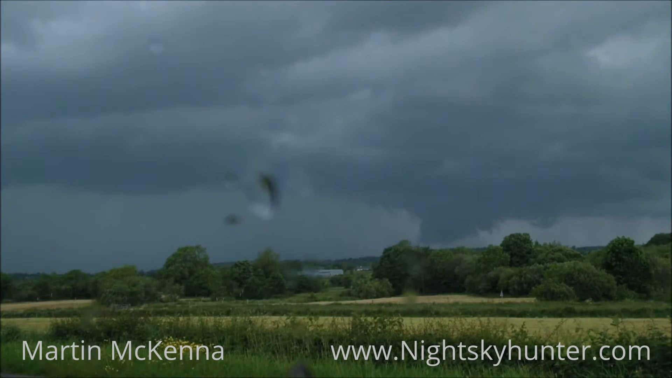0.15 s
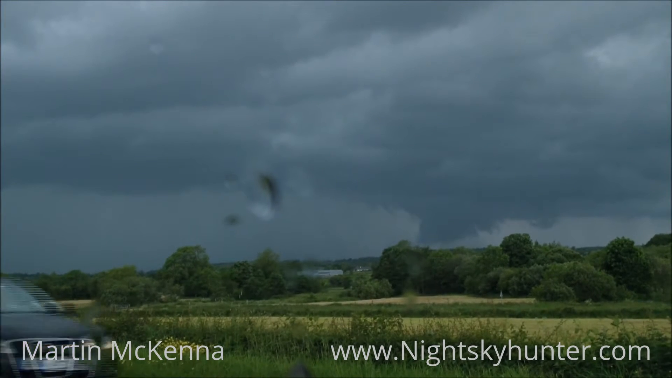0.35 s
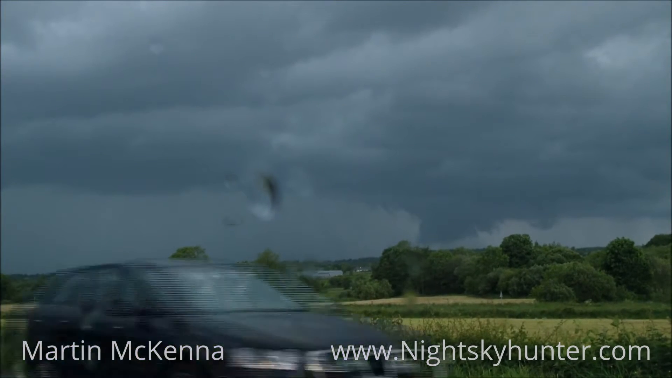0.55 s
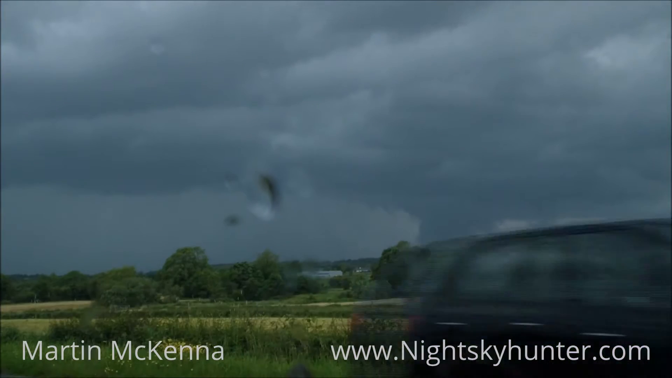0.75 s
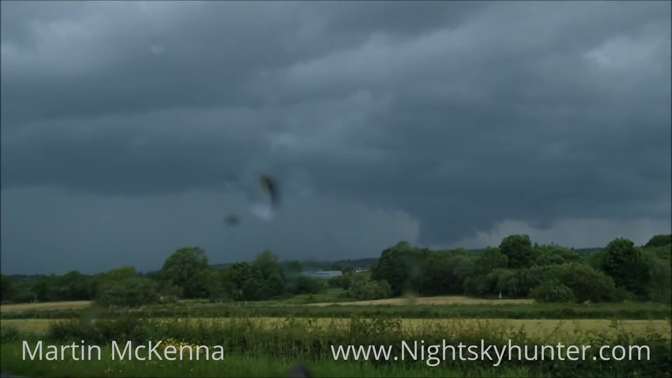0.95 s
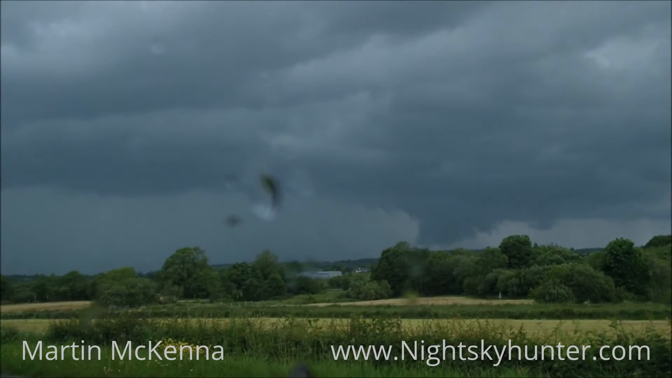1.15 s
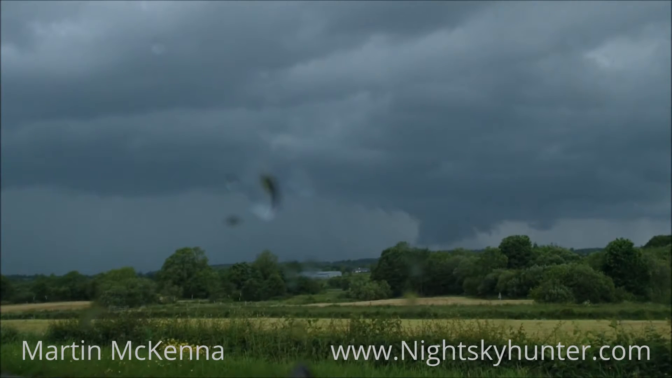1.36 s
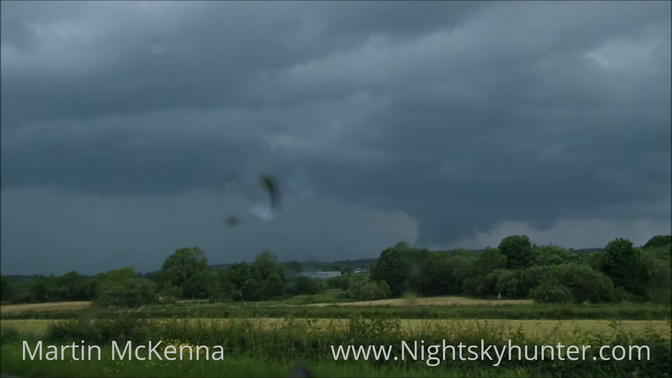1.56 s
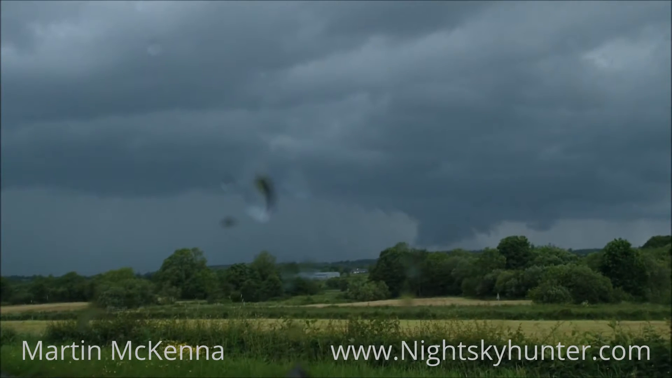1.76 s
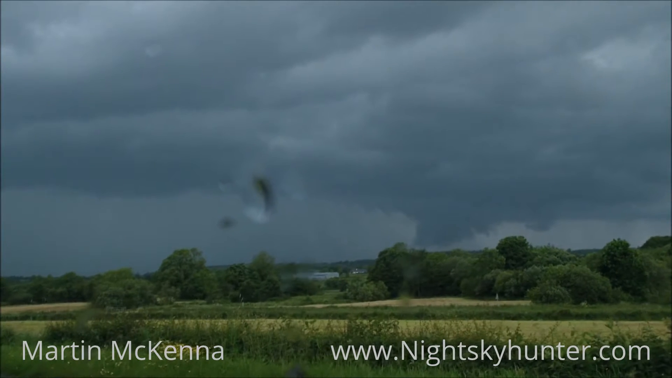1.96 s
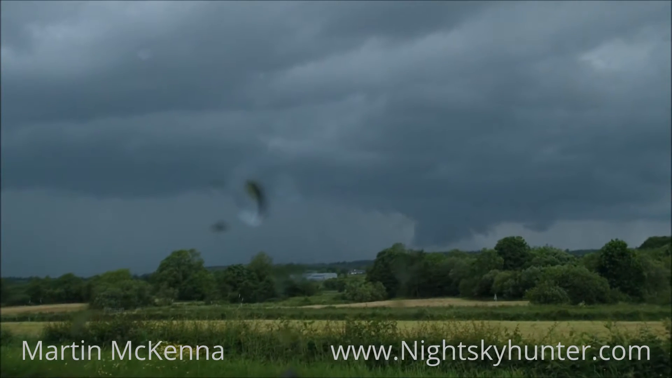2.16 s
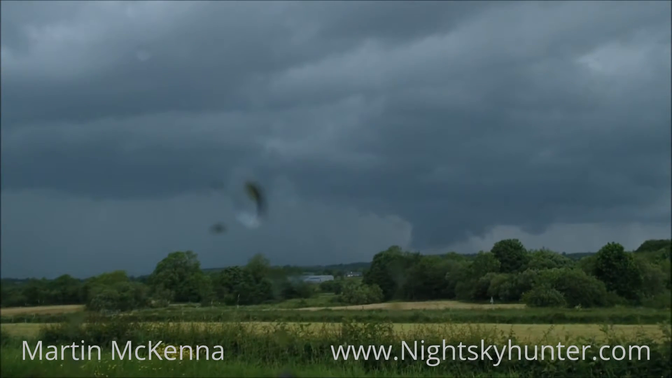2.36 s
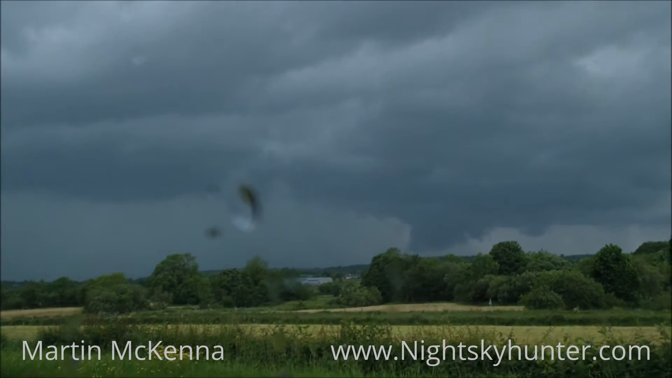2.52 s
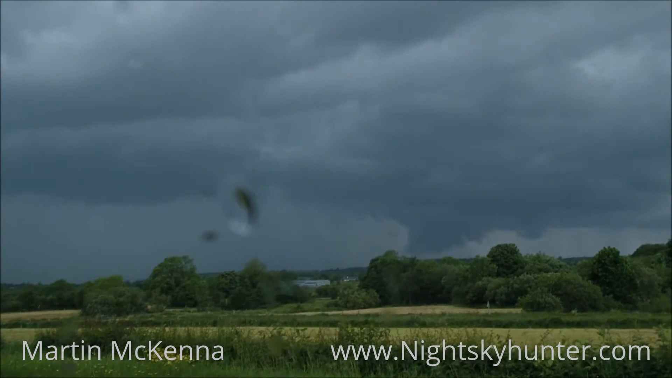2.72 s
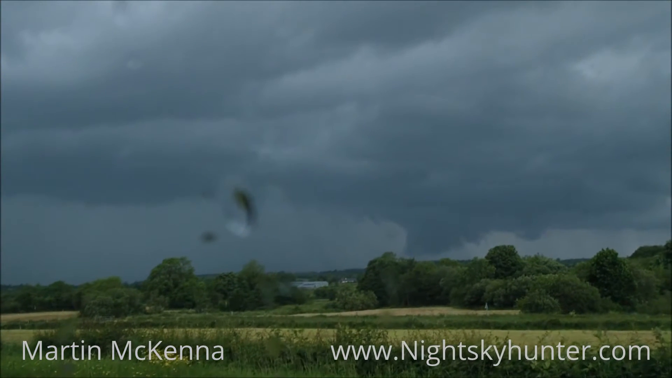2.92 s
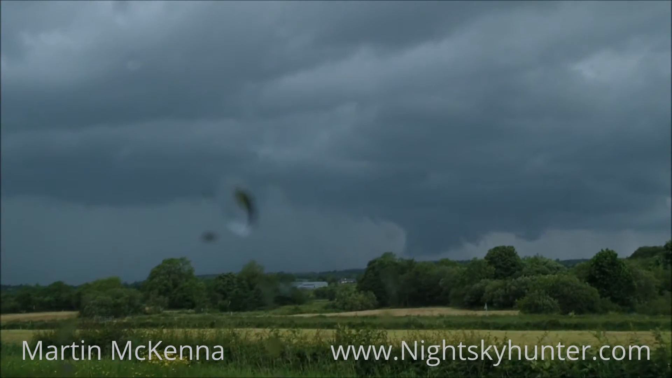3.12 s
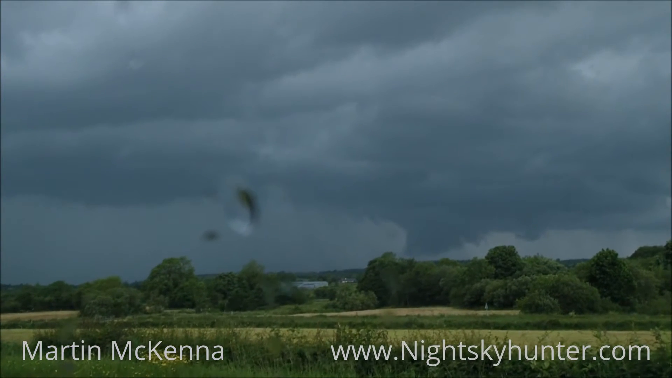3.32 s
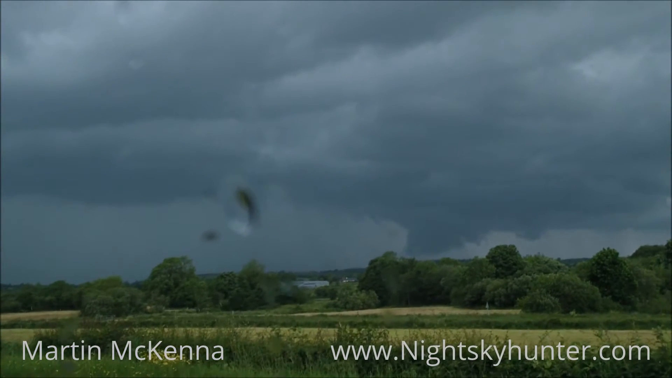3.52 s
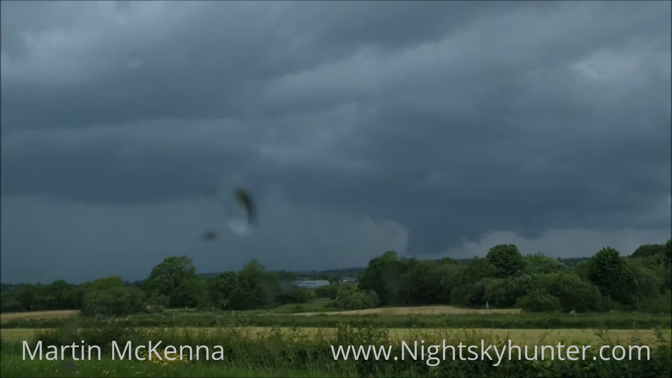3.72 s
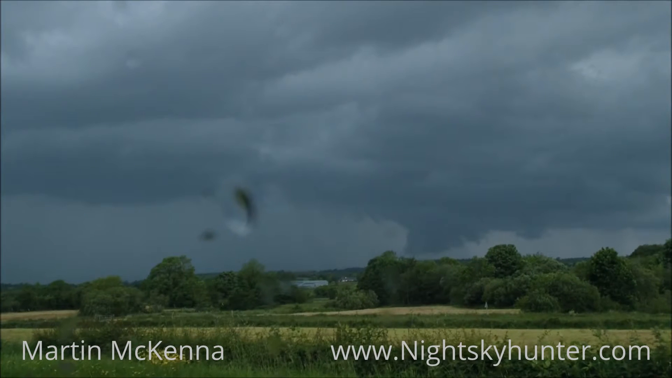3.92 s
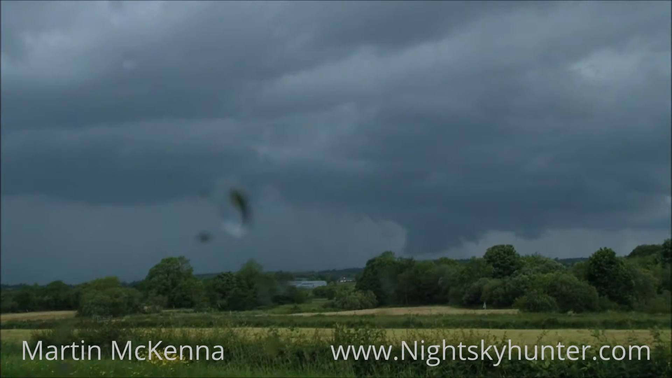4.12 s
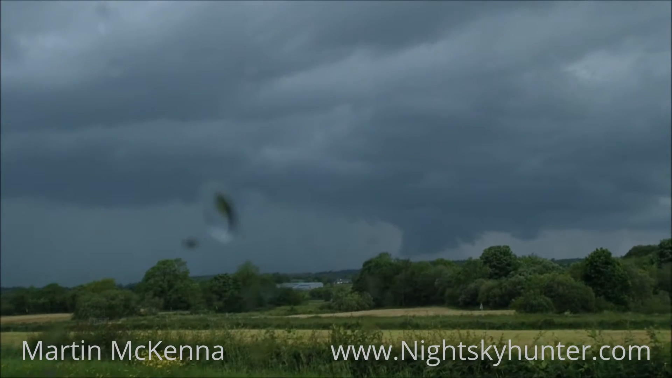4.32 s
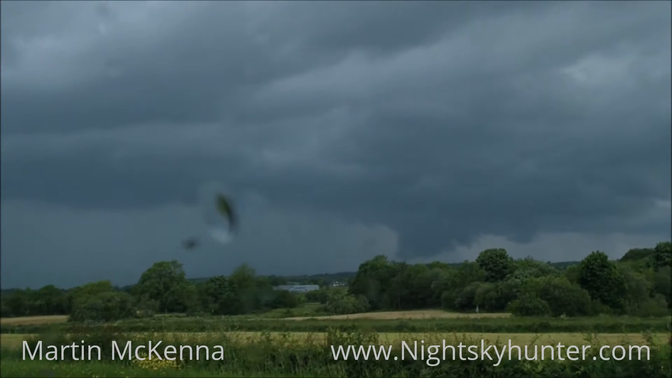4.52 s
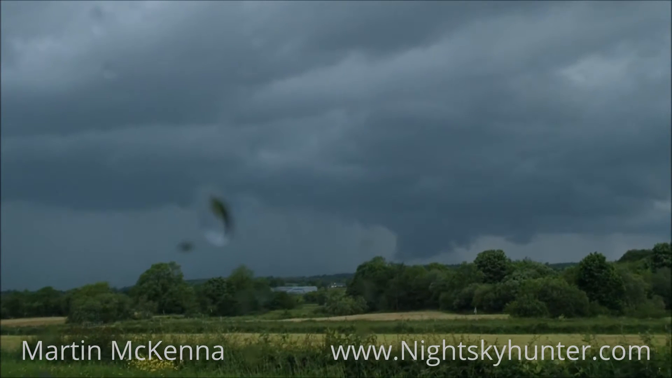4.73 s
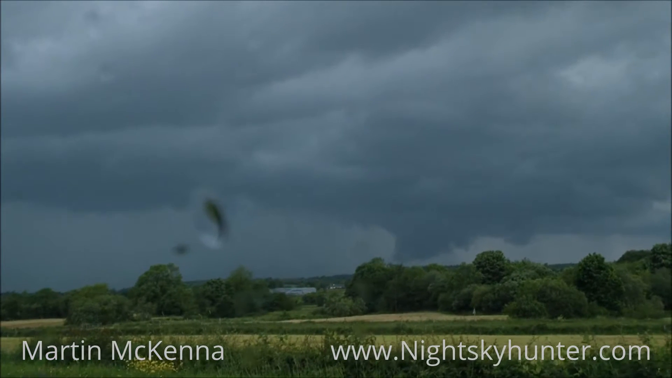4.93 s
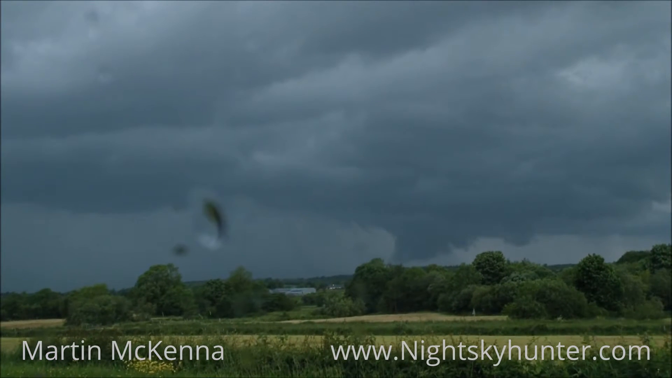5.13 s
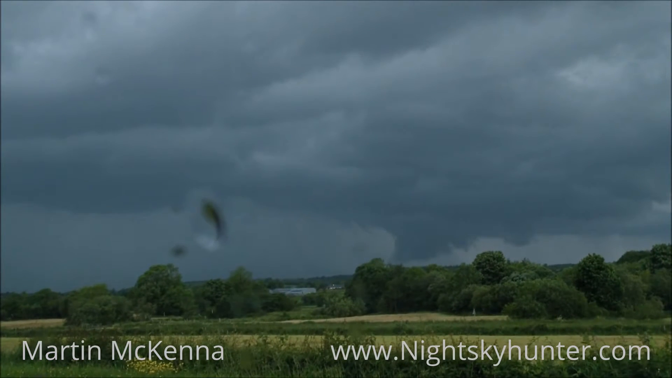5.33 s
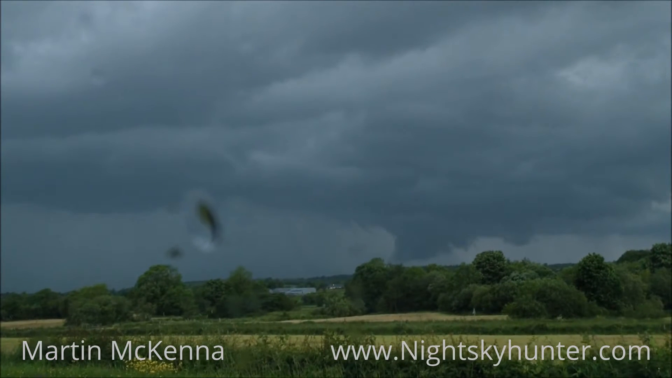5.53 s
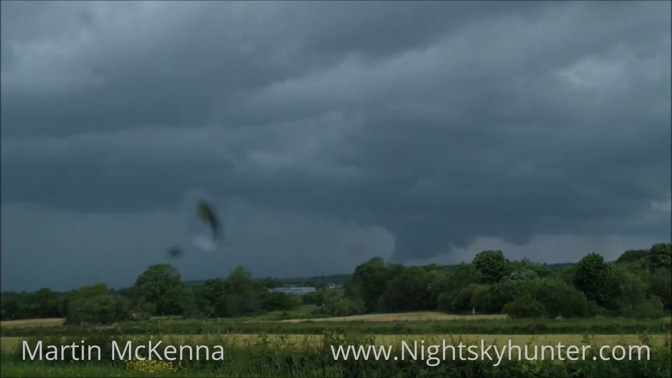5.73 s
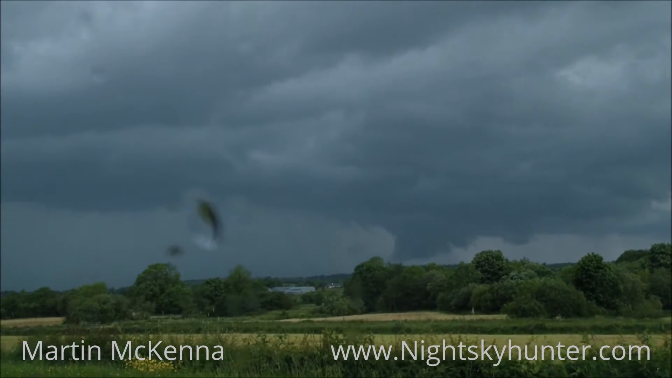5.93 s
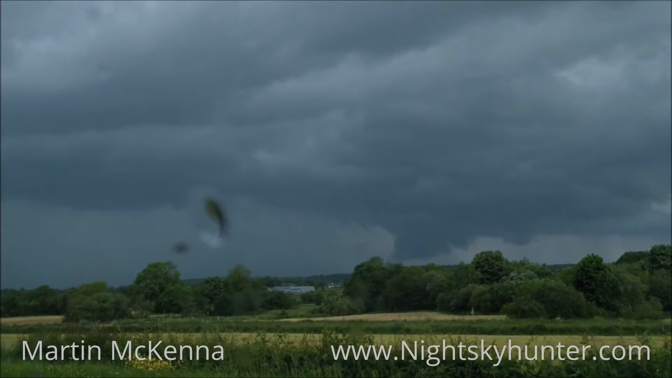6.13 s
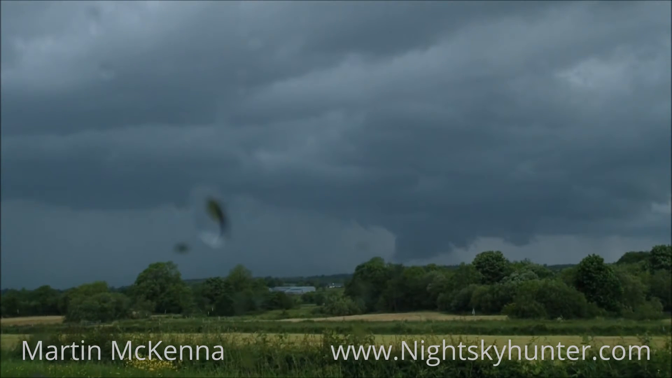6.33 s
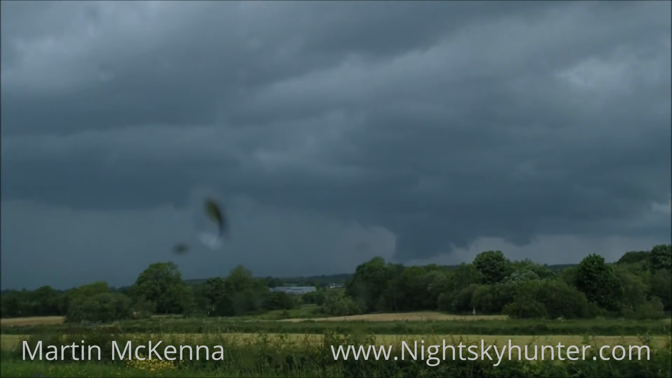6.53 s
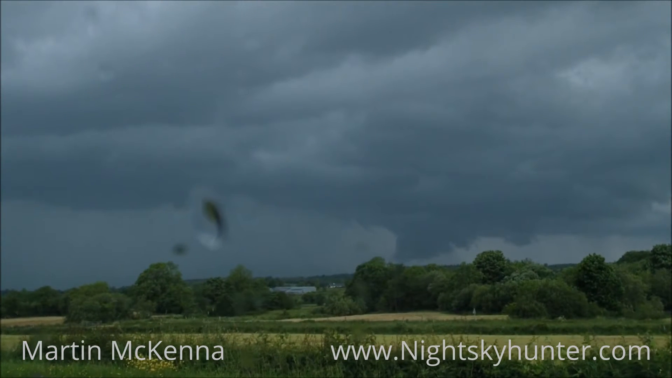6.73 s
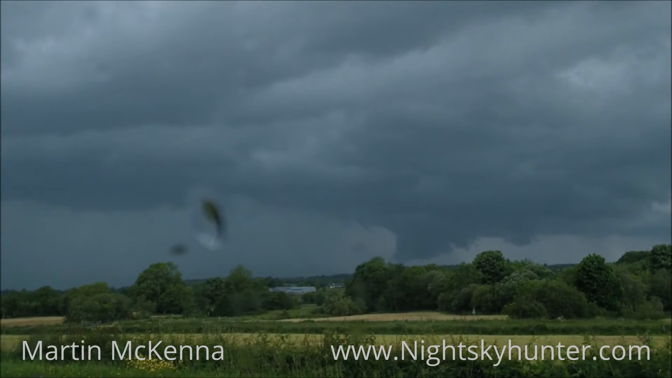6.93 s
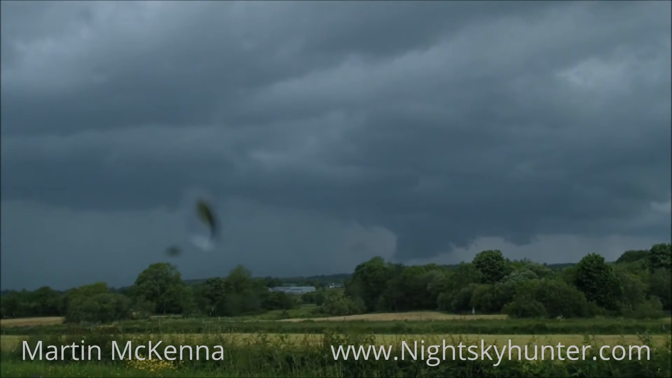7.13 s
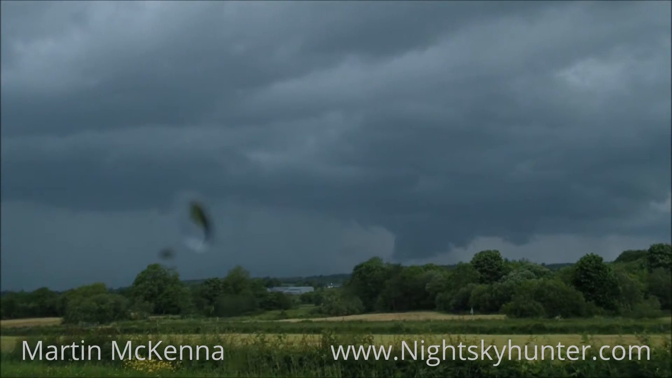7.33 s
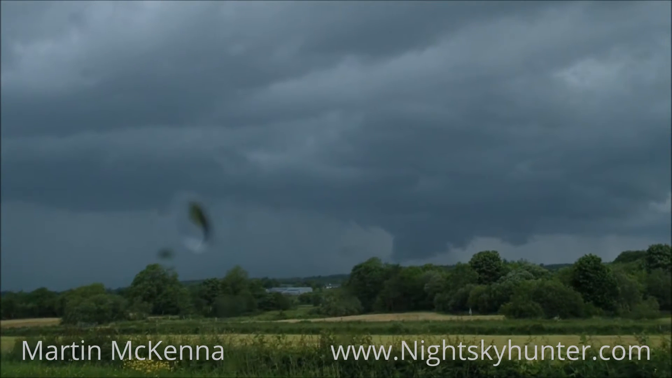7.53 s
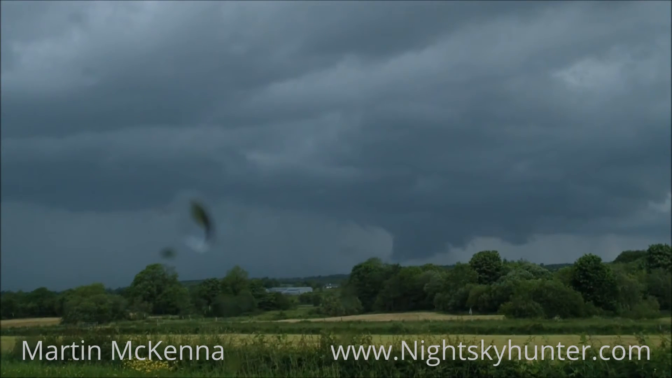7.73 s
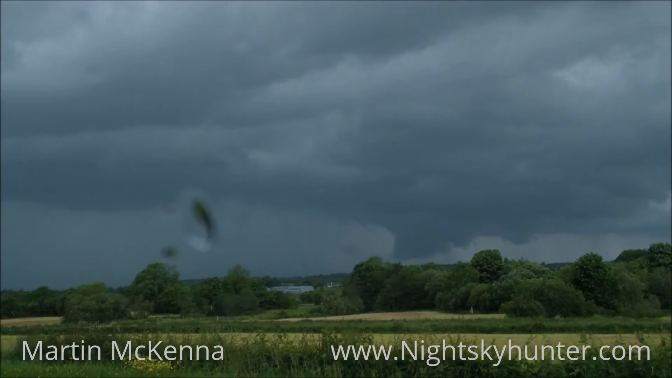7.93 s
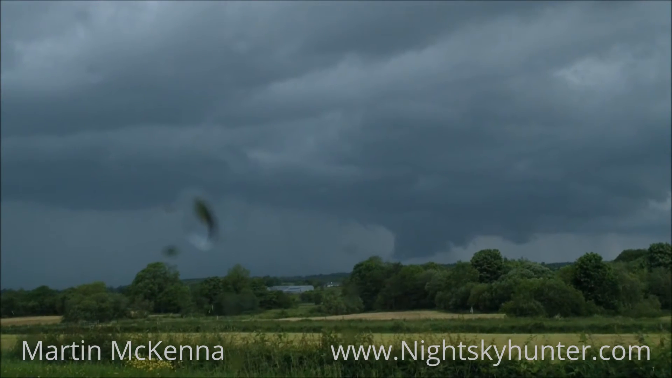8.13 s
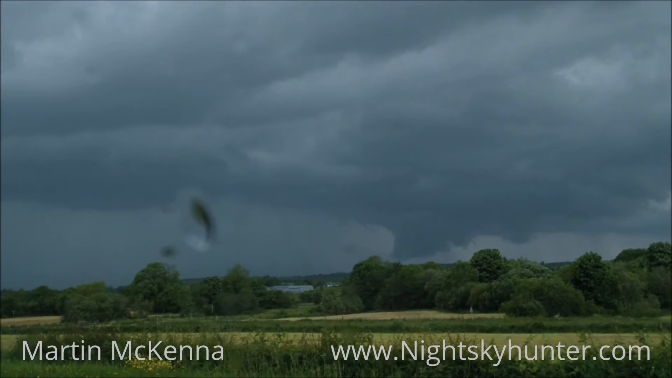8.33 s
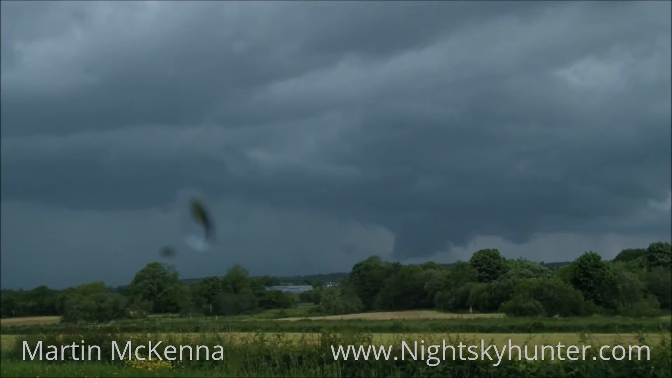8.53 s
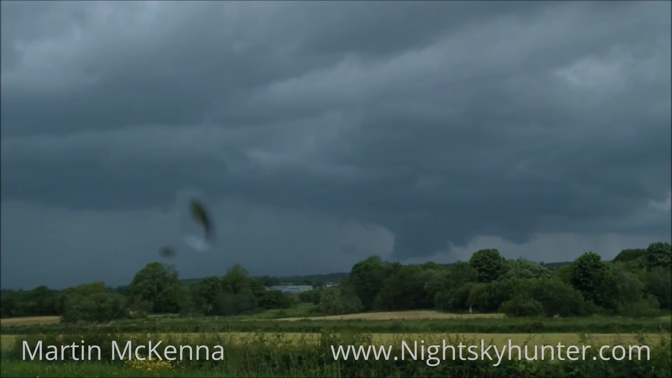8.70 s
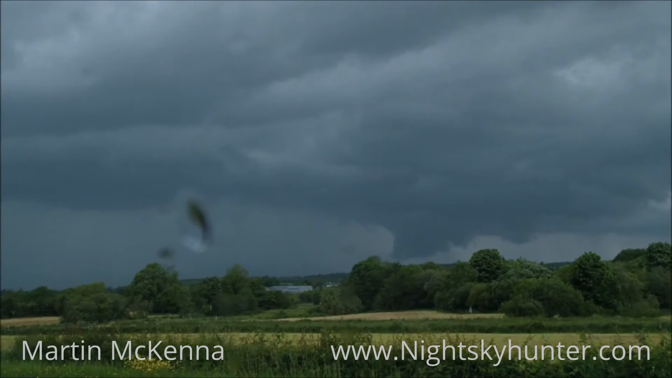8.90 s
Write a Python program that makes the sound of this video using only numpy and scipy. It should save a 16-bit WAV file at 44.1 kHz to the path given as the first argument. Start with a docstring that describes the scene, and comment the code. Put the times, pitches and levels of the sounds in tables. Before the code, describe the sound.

Heard from inside a parked car on a country road, another car passes close by with a roar and hiss of tyres. Its wake buffets the cabin, and the exhaust drone drops in pitch and fades away. Close to the microphone come a brief squeaky scrape, scattered plastic clicks, and a hand knocking and rubbing on the camera. Two soft thumps shake the cabin near the end, over a faint low hum.

```python
"""A car passes close by on a country road, heard from inside a parked car. First its tyres roar and hiss
as it nears. Just before 1 s it goes by: its wake buffets the cabin, and the exhaust note drops and drones
away while gusts rock the parked car. Around 2 s something scrapes and squeaks near the microphone, and
plastic starts to click as the camera is handled. From 4.6 s a hand rubs and knocks the camera.
Two soft thumps shake the cabin at 6.2 s and 7.7 s; a faint hum sets in with the first."""
import sys
import numpy as np
from scipy import signal
from scipy.fft import rfft, irfft, next_fast_len
from scipy.io import wavfile
from scipy.ndimage import uniform_filter1d

SR = 44100
rng = np.random.default_rng(int(sys.argv[2]) if len(sys.argv) > 2 else 0)


def log_audio(samples):
    """Write samples as a 16-bit WAV file to the path given in sys.argv[1]."""
    # one column per channel
    frames = np.atleast_2d(samples).T
    # limit to full scale, then quantise
    limited = np.clip(frames, -1, 1)
    pcm = np.round(limited * 32767).astype(np.int16)
    wavfile.write(sys.argv[1], SR, pcm)


N = 399546
T = np.arange(N) / SR
SPEED_M_S, CLOSEST_M = 20.5, 4.18
WHEELS_PASS_S, TAILPIPE_PASS_S = .81, .93
WAKE_S, WAKE_HALF_S = .842, .022  # when the air dragged behind the car hits, and half its length


# The tyres swish just before and after passing: (t/s, half length/s, roar gain/dB, hiss gain/dB)
SWISHES = [(0.52, 0.14, -1, -1), (0.695, 0.03, -4, 2), (0.845, 0.028, 3, 4), (1.097, 0.18, 1, 5.5)]


def tyres(fade_m=15):
    """Rolling tyres rumble, roar and hiss; the uneven road makes the sound flutter."""
    distance, bearing = position(WHEELS_PASS_S)
    gone_m = distance * np.maximum(bearing, 0)
    near_share = 1 / (1 + (gone_m / fade_m) ** 4)
    near, far = np.sqrt(near_share), np.sqrt(1 - near_share)
    road_db = .5 * wobble(12)
    roar_db, hiss_db = sum(np.outer(gains, swell(s, half_s)) for s, half_s, *gains in SWISHES)
    rumble = body_rumble()
    roar = tread_roar(bearing, near, far) * undb(roar_db + road_db)
    hiss = tyre_hiss(distance, bearing, near, far) * undb(hiss_db + road_db)
    return rumble + roar + window_echoes(hiss)


# Tone of the tread on the road: (f/Hz, level/dB)
ROAR_TONE = [(300, -31), (400, -4.5), (520, -8), (600, 1.5), (700, -2), (830, 1.5), (970, 4), (1100, -0.5),
             (1240, -9.5), (1550, -12.5), (1800, -17), (2200, -24.5), (3500, -44), (9000, -68)]
# Tread blocks singing, the far-off ring, and ringing panels and cabin: (f/Hz, width/Hz, gain/dB)
TREAD_PEAKS = [(936, 420, 4.5), (1169, 37, -7.5), (1317, 160, 5)]
FAR_PEAKS = [(611, 39, -15.5), (623, 14, 6.5), (750, 18, 10.5), (860, 22.4, -17), (885, 14, 9.5),
             (948, 26, 7), (1002, 24, 9.5), (1089, 61, -7.5), (1170, 27, -0.5), (1342, 16, 9),
             (1417, 39, -8)]
CABIN_PEAKS = [(463, 8.6, 10), (600, 15, -1), (724, 16, 2), (778, 19, -10), (823, 16, 7.5),
               (1234.6, 32, 11), (1371, 21, 5.5), (1481, 11, 9.5), (1747, 28, 10)]
# The roar swells and sinks, slowly or in flurries: (t/s, half length/s, gain/dB)
ROAR_SWELLS = [(0.085, 0.018, 1.5), (1.697, 0.25, -2), (2.883, 0.0086, 2.5), (3.193, 0.0054, 5),
               (3.651, 0.0092, 9), (4.0, 1, 1), (4.23, 0.0088, 9.5), (7.3, 1, -2), (8.956, 0.21, 2)]


def tread_roar(bearing, near, far):
    """Tread blocks hit the road: higher coming, lower going, while the cabin's own notes stay put."""
    shifted = delay(colour(noise(), ROAR_TONE, TREAD_PEAKS), np.cumsum(doppler(bearing)))
    roar = near * unit(shifted) + far * unit(colour(noise(), ROAR_TONE, FAR_PEAKS))
    inside = unit(colour(roar, [(20, 0), (20000, 0)], CABIN_PEAKS))
    gain = passing(WHEELS_PASS_S, coming_db=-9, side_db=-24, going_db=-18.5, loss_db=5.5)
    return lean_right(inside * gain * undb(swells_db(ROAR_SWELLS) + 1.1 * wobble(60)), db=0.84)


# Tone of the tyre hiss: (f/Hz, level/dB)
HISS_TONE = [(1200, -0.5), (2000, 2.5), (2300, -1.5), (2700, -2.5), (3500, -5.5), (4500, -8), (6400, -16),
             (9000, -16.5), (15500, -27.5)]
# How it changes in front of, beside and behind the car: (f/Hz, width/Hz, gain/dB)
FRONT_PEAKS = [(2080, 160, 8.5), (2430, 360, -12), (4320, 550, 3), (5570, 1200, -3), (6900, 350, 6),
               (7760, 400, 5.5), (11600, 900, 0)]
SIDE_PEAKS = [(2310, 400, -0.5), (4230, 410, -3.5), (6700, 900, 2), (7850, 400, 3)]
REAR_PEAKS = [(2190, 200, 1.5), (2500, 670, -2.5), (3170, 470, 6), (5400, 750, 8), (7040, 2100, -10)]


def tyre_hiss(distance, bearing, near, far, echo_gain=0.043, echo_s=0.00087, front_m=9):
    """Fine hiss, bright until the car has gone by; an echo off the bodywork sweeps through it."""
    side = colour(noise(), HISS_TONE, SIDE_PEAKS)
    side = unit(side + echo_gain * delay(side, echo_s * SR * (1 + 0.19 * bearing)))
    front = unit(colour(noise(), HISS_TONE, FRONT_PEAKS))
    rear = unit(colour(noise(), HISS_TONE, REAR_PEAKS, tilt=-1.25))
    to_come_m = -distance * np.minimum(bearing, 0)
    side_share = 1 / (1 + (to_come_m / front_m) ** 4)
    bright = np.sqrt(1 - side_share) * front + np.sqrt(side_share) * side
    gain = passing(WHEELS_PASS_S, coming_db=-24.5, side_db=-35, going_db=-32, loss_db=6)
    return (near * bright + far * rear) * gain * undb(.8 * wobble(30))


# Tone of the rumble: (f/Hz, level/dB)
RUMBLE_TONE = [(20, -2.5), (45, -9), (70, -13.5), (95, -4), (140, -1.5), (210, 1), (260, -0.5), (320, -3),
               (385, -6.5), (455, 2.5), (540, -17), (800, -26.5), (2000, -56.5)]
# Pitches that cancel out in the cabin: (f/Hz, width/Hz, gain/dB)
RUMBLE_DIPS = [(133, 21, -2), (274, 27, -4), (414, 68, -16)]


def body_rumble(wake_db=3):
    """The car's body rumbles, briefly louder as its wake buffets the cabin."""
    rumble = unit(colour(noise(), RUMBLE_TONE, RUMBLE_DIPS))
    gain = passing(WHEELS_PASS_S, coming_db=-16.5, side_db=-20.5, going_db=-25.5, loss_db=5)
    return rumble * gain * undb(wake_db * swell(WAKE_S, WAKE_HALF_S) + wobble(6.6))


# Bands of road noise that swell and fade: (t/s, half length/s, f/Hz, width/Hz, level/dB)
NOISE_BANDS = [(.48, 0.23, 2780, 650, -40.5), (0.715, 0.11, 2670, 473, -35.5),
               (1.187, 0.23, 1490, 450, -36.5), (1.2, 0.38, 3300, 110, -50), (4.179, 1, 1338, 64.35, -51.5),
               (4.221, 0.099, 975, 60, -47)]


def band_swells():
    """Bands of road noise come and go: a bright surge close by, thin tones in the distance."""
    out = 0
    for s, half_s, hz, width, db in NOISE_BANDS:
        band = signal.butter(2, [hz - width / 2, hz + width / 2], "band", fs=SR, output="sos")
        out = out + unit(signal.sosfilt(band, noise())) * swell(s, half_s) * undb(db)
    return out


# The exhaust drone fades and returns, rising slightly in pitch: (t/s, f/Hz at the car, level/dB)
DRONE_CURVE = [(0, 181.4, -4.5), (.62, 181.4, -0.5), (.78, 181.2, 1.5), (.9, 181, 0.5), (1.4, 180.6, 1.5),
               (1.55, 181.1, -5), (1.75, 180.8, 2), (2.25, 182, -11), (2.7, 184.3, -1), (3.1, 185.4, 1),
               (3.4, 186.4, -2), (3.85, 187.7, 4), (4.65, 188.1, 2.5), (5.6, 187.1, -9), (9.06, 187, -0.5)]
# Engine tones, each briefly swelling or dipping at its own moment:
# (cycles per engine turn, level/dB, swell gain/dB, swell t/s, half length/s)
ENGINE_TONES = [(3, -13.5, 3.5, 1.3, 0.16), (4, -10, 10, 1.97, 0.34), (6, 7, -3, 1.31, 0.19),
                (8, -23, 15, 1.17, .12), (9, -25, 25, 1.265, 0.18), (11, -25, 17.5, 1.155, 0.14),
                (19, -31, 22, 0.79, .2)]


def exhaust(drop_lag_s=0.0701, waver_db=0.74, shade_db=-8, wake_db=-6):
    """A clean drone and weaker engine tones, all dropping in pitch as the car goes by."""
    times, pitches, levels_db = np.transpose(DRONE_CURVE)
    _, bearing = position(TAILPIPE_PASS_S + drop_lag_s)
    drone_hz = np.interp(T, times, pitches) * (1 - doppler(bearing)) * (1 + .0012 * wobble(25))
    engine_angle = phase(drone_hz) / 6  # the drone makes six cycles per turn
    tones = 0
    for cycles, db, swell_db, s, half_s in ENGINE_TONES:
        level = undb(db + waver_db * wobble(11) + swell_db * swell(s, half_s))
        tones = tones + level * np.sin(cycles * engine_angle + rng.uniform(0, 2 * np.pi))
    # the car's body blocks the sound until its tail comes into view
    in_view_s = TAILPIPE_PASS_S - 0.22
    hidden = (1 - np.tanh((T - in_view_s) / 0.011)) / 2
    dips_db = shade_db * hidden + wake_db * swell(WAKE_S, WAKE_HALF_S)
    gain = passing(TAILPIPE_PASS_S, coming_db=-15.5, side_db=-12, going_db=-20.5, loss_db=6)
    return unit(tones) * gain * undb(np.interp(T, times, levels_db) + dips_db)


# Hollow knocks: (t/s, level/dB, time to fade 60 dB/s, tilt/dB per octave)
KNOCKS = [(4.586, -33, 0.035, -8), (4.6, -40.5, .04, -4), (4.6827, -24, 0.028, -4.5),
          (4.6851, -20, 0.042, 1), (4.6912, -25.5, 0.092, -2), (4.868, -28.5, 0.086, -4),
          (4.907, -38, .06, -7), (5.334, -41, 0.25, -5.5), (6.158, -40, 0.06, -29),
          (6.231, -33, 0.055, -10), (6.245, -30.5, 0.036, -13), (6.67, -39.5, 0.091, -3.5),
          (6.722, -36, 0.084, -2.5), (7.662, -33.5, 0.092, -17), (7.93, -44, 0.48, -5.5),
          (8.4979, -37, 0.22, -4), (8.535, -47, .2, -11)]
# Small clicks: (t/s, level/dB, time to fade 60 dB/s, tilt/dB per octave, ringing f/Hz)
CLICKS = [(1.879, -32, .02, 3, 8000), (1.9684, -15.5, 0.033, 10, 12500), (2.02, -19.5, 0.056, 4, 3560),
          (2.251, -36.5, 0.089, -4, 4300), (2.286, -34.5, 0.015, 5, 8400),
          (2.4616, -18.5, 0.042, -2.5, 5100), (2.5935, -33.5, 0.062, -1, 4200),
          (2.652, -38, 0.044, -2, 2200), (2.814, -25, 0.083, -4, 5000), (2.926, -36, .06, -0.5, 2100),
          (3.712, -34.5, 0.037, 2, 3100), (6.465, -42, 0.041, 5, 4200), (6.565, -36.5, 0.066, 2.5, 3000),
          (7.03, -42, .088, 4, 3200), (7.072, -37, 0.026, 11, 7800), (7.2228, -32.5, 0.05, 1, 5650),
          (7.466, -40.5, .05, 5, 3000), (7.812, -43, .05, -4, 3000), (7.9788, -34, 0.043, 3, 3400),
          (8.4343, -29.5, 0.019, 5, 8040), (8.688, -42.5, 0.15, 0, 3200), (8.773, -32.5, 0.012, 11, 9900)]
# Tone of a knock and of a click: (f/Hz, level/dB)
KNOCK_TONE = [(60, -0.5), (110, 1.5), (175, 1.5), (275, 7.5), (430, -2), (600, 5), (900, 4.5), (1200, -2.5),
              (1400, 0.5), (1650, -5.5), (2050, 2.5), (2850, -2.5), (3300, -5), (4050, -15), (5400, -9.5),
              (7400, -14), (8100, -10.5), (15000, -21.5)]
CLICK_TONE = [(200, -8), (1200, 2), (1600, -3), (2000, 6), (2400, 0), (2750, 6), (3150, 0), (3750, 5),
              (4200, -2), (5000, 1), (6200, -6), (9000, -10.5), (15000, -21.5)]
# Pings and creaks of small parts: (t/s, f/Hz, level/dB, ring time/s)
PINGS = [(2.4613, 5160, -11, 0.0012), (4.6867, 2600, -15.5, 0.0035), (4.689, 2100, -14, 0.0043),
         (8.93, 4580, -38, 0.002), (8.963, 4130, -38, .002), (8.984, 4300, -34, 0.0018)]


def handling(click_trim_db=-4.5):
    """The camera's plastic parts tap together and ring briefly."""
    out = np.zeros((2, N))
    for s, db, fade_s, tilt in KNOCKS:
        add(out, s, undb(db) * tap(KNOCK_TONE, fade_s, tilt, rise_s=0.0022, crack_db=8))
    for s, db, fade_s, tilt, hz in CLICKS:
        click = tap(CLICK_TONE, fade_s, tilt, rise_s=0.00031, crack_db=-17, peaks=[(hz, 0.26 * hz, 7)])
        add(out, s, undb(db + click_trim_db) * click)
    t = T[:SR // 20]
    for s, hz, db, ring_s in PINGS:
        envelope = np.exp(-t / ring_s) * (1 - np.exp(-t / 0.00032))
        add(out, s, undb(db) * np.sin(2 * np.pi * hz * t) * envelope)
    return out


def tap(tone, fade_s, tilt, rise_s, crack_db, peaks=()):
    """One hit on plastic: a sharp crack, then a ring of fading noise."""
    t = T[:SR // 3]
    crack = undb(crack_db) * np.exp(-t / rise_s / 2)
    envelope = (crack + undb(-60 * t / fade_s)) * (1 - np.exp(-t / rise_s))
    hit = colour(noise(len(t)) * envelope, tone, peaks, tilt)
    return hit * np.sqrt(np.sum(envelope ** 2) / np.sum(hit.mean(axis=0) ** 2))


# Soft blows and their bounces: (t/s, level/dB, contact time/s)
THUMPS = [(6.232, -19, 0.0041), (6.252, -16, 0.0099), (6.271, -14, 0.014), (6.325, -22, 0.013),
          (7.664, -19.5, 0.0054), (7.673, -24.5, 0.0054), (7.682, -20, 0.0076), (7.703, -20, 0.0082),
          (7.749, -29, 0.012)]
# The cabin's low notes: (f/Hz, level/dB, time to fade 60 dB/s)
CABIN_NOTES = [(40.3, -11, .2), (60.8, -2.5, 0.2), (84, -9, 0.17), (113.3, -4.5, 0.23), (131, 3.5, 0.11),
               (162, 4, 0.092), (255, 10.5, 0.055), (318, 4, 0.06), (425, -3, 0.07), (557, -9, 0.06)]


def thumps():
    """Padded blows set the cabin ringing; a longer contact sounds duller."""
    t = T[:SR // 2]
    ring = sum(undb(db - 60 * t / fade_s) * np.cos(2 * np.pi * hz * t) for hz, db, fade_s in CABIN_NOTES)
    out = np.zeros(N)
    for s, db, contact_s in THUMPS:
        push = np.sin(np.pi * np.minimum(t / contact_s, 1)) ** 2
        add(out, s, undb(db) * signal.fftconvolve(ring, push / push.sum())[:len(t)])
    return out


# Gritty slides: (t/s, half length/s, level/dB)
SLIDES = [(1.931, 0.027, -32.5), (1.981, 0.01, -29), (2.024, 0.025, -36), (2.067, 0.02, -38.5),
          (2.524, 0.087, -51.5), (3.29, 0.043, -50), (3.81, 0.026, -47.5), (5.118, 0.025, -47),
          (7.089, 0.015, -48)]
# Tone of the grit: (f/Hz, level/dB)
SCRAPE_TONE = [(1000, 8), (2200, 1.5), (3400, 1), (4200, -1), (5300, 3.5), (7000, -6), (8200, -2),
               (12500, -6), (15500, -11)]
# Thin squeaks: (t/s, half length/s, level/dB, f/Hz, glide/Hz per s)
SQUEAKS = [(2.004, .012, -39, 4650, -9000), (2.059, 0.021, -33, 4880, 700)]


def scrape():
    """Something slides in short, gritty strokes and squeaks where it catches."""
    grit = noise() * undb(2 * wobble(700))
    out = unit(colour(grit, SCRAPE_TONE)) * surges(SLIDES)
    for s, half_s, db, pitch_hz, glide in SQUEAKS:
        hz = pitch_hz + glide * np.clip(T - s, -half_s, half_s)
        squeak = unit(np.sin(phase(hz * (1 + 0.017 * wobble(1300)))))
        out = out + squeak * swell(s, half_s) * undb(db + 2 * wobble(390))
    return out


# Strokes of the hand: (t/s, half length/s, level/dB)
RUBS = [(4.93, 0.035, -41.5), (5.335, 0.083, -47), (6.527, 0.12, -50.5), (6.724, 0.091, -45.5),
        (6.863, 0.061, -50), (7.06, 0.039, -43), (7.43, 0.073, -49.5), (7.92, 0.098, -49.5),
        (8.19, 0.057, -48), (8.573, 0.15, -49.5), (8.956, 0.04, -44.5)]
# Tone of the rubbing: (f/Hz, level/dB)
RUSTLE_TONE = [(100, 13.5), (300, 6.5), (700, 13), (1400, 5.5), (2200, 0), (3100, -0.5), (4200, -3.5),
               (7000, -11), (15000, -24)]


def rustle(slips_per_s=300, ring_s=0.0039, scatter_db=6.3, shifting_from_s=4.6):
    """A hand rubs the camera: many tiny slips of uneven size, each a short puff of noise."""
    grip = undb(np.where(T < shifting_from_s, -65, -55) + 3 * wobble(7))
    slipping = rng.random(N) < slips_per_s / SR
    slips = slipping * undb(scatter_db * np.minimum(rng.exponential(size=N), 3))
    energy = signal.lfilter([1], [1, -np.exp(-1 / (ring_s * SR))], slips ** 2 + 1e-12)
    return unit(colour(noise() * np.sqrt(energy), RUSTLE_TONE)) * np.hypot(grip, surges(RUBS))


# Gusts of air: (t/s, half length/s, level/dB)
GUSTS = [(1.083, 0.17, -31), (2.432, 0.28, -37.5), (3.2, 0.18, -43), (4.87, .08, -39), (5.31, 0.055, -38)]
# Tone of a gust: (f/Hz, level/dB)
GUST_TONE = [(15, -3), (28, 1), (45, -7), (90, -25), (400, -54)]


def gusts():
    """Moving air leans on the parked car: a deep, soft rumble."""
    return unit(colour(noise(), GUST_TONE)) * surges(GUSTS)


# Tone of the steady air and hiss: (f/Hz, level/dB)
AIR_TONE = [(20, -66), (33, -65), (48, -71.5), (75, -70.5), (120, -77), (175, -76.5), (260, -82),
            (500, -81.5), (1500, -94), (3000, -97), (6000, -99), (15500, -102)]
# How much of it differs between left and right: (f/Hz, level/dB)
AIR_WIDTH = [(60, -8.5), (800, -6), (3000, 0.5), (14000, -0.5)]


def background(hum_from_s=6.2, hum_hz=72, whine_hz=15650):
    """Low outdoor murmur, microphone hiss, a late hum and the camera's faint whine."""
    air = colour(noise(width=AIR_WIDTH), AIR_TONE) * np.sqrt(SR / 2) * undb(0.07 * wobble(3))
    fade_in = np.clip(2 * (T - hum_from_s), 0, 1)
    hum = np.sin(phase(hum_hz * (1 + 0.01197 * wobble(2.4)))) * fade_in
    whine = np.sin(2 * np.pi * whine_hz * T)
    return air + undb(-51.5) * hum + undb(-70) * whine


# How much left and right differ, little in the bass and a lot in the treble: (f/Hz, level/dB)
STEREO_WIDTH = [(60, -18.5), (700, -23), (1300, -14.5), (2400, -14), (4400, -8.5), (8000, -3), (14000, 0.5)]


def noise(n=N, width=STEREO_WIDTH):
    """Stereo noise: a shared part, plus a part added on the left and taken away on the right."""
    shared, side = rng.standard_normal((2, n))
    return shared + np.array([[1], [-1]]) * colour(side, width)


def window_echoes(x, ring_s=0.0037, echo_db=-4):
    """Sound bounces quickly between the cabin's windows, rippling its tone."""
    t = T[:SR // 20]
    echoes = rng.standard_normal(len(t)) * t * np.exp(-t / ring_s)
    echoes = echoes * undb(echo_db) / np.sqrt(np.sum(echoes ** 2))
    return (x + signal.fftconvolve(x, echoes[None])[:, :N]) / np.hypot(1, undb(echo_db))


def position(pass_s):
    """The car's distance in metres, and its bearing from -1 (coming) to 1 (going)."""
    along = SPEED_M_S * (T - pass_s)
    distance = np.hypot(along, CLOSEST_M)
    return distance, along / distance


def passing(pass_s, coming_db, side_db, going_db, loss_db):
    """Blend the front, side and rear levels, then lose loss_db each time the distance doubles."""
    distance, bearing = position(pass_s)
    lengthways = np.where(bearing < 0, undb(coming_db), undb(going_db)) * bearing
    sideways = undb(side_db) * CLOSEST_M / distance
    return np.hypot(lengthways, sideways) * undb(-loss_db * np.log2(distance / CLOSEST_M))


def doppler(bearing, sound_m_s=343):
    """Share by which pitch falls as the car moves away (negative while it nears)."""
    return SPEED_M_S * bearing / sound_m_s


def colour(x, tone, peaks=(), tilt=0):
    """Filter by a tone outline, peaks or dips, and a tilt in dB per octave above 500 Hz."""
    n = 2 * next_fast_len(x.shape[-1])
    f = np.fft.rfftfreq(n, 1 / SR)
    tone_hz, tone_db = np.transpose(tone)
    gain_db = np.interp(np.log(f + 1), np.log(tone_hz), tone_db)
    gain_db += tilt * np.log2(np.maximum(f, 500) / 4000)
    for hz, width, db in peaks:
        gain_db += db / (1 + (2 * (f - hz) / width) ** 2)
    # ring only after a hit, never before it (minimum phase), so taps stay sharp
    cepstrum = irfft(np.log(undb(gain_db)))[:n // 2]
    cepstrum[1:] *= 2
    return irfft(rfft(x, n) * np.exp(rfft(cepstrum, n)))[..., :x.shape[-1]]


def wobble(per_s):
    """A smooth random wander of size about 1, with per_s new values a second."""
    hold = max(int(SR / per_s), 1)
    steps = np.repeat(rng.standard_normal(N // hold + 1), hold)
    return unit(uniform_filter1d(uniform_filter1d(steps, hold), hold)[:N])


def swell(s, half_s):
    """A smooth rise and fall, 1 at time s."""
    return np.exp(-((T - s) / half_s) ** 2)


def swells_db(rows):
    """Smooth boosts and dips, in decibels."""
    return sum(db * swell(s, half_s) for s, half_s, db in rows)


def surges(rows):
    """A gain that rises out of silence once for each row."""
    return sum(undb(db) * swell(s, half_s) for s, half_s, db in rows)


def delay(x, samples):
    """Delay both channels by a changing number of samples."""
    index = np.arange(N)
    return np.array([np.interp((index - samples) % N, index, channel) for channel in x])


def phase(hz):
    """Running angle of a tone whose pitch changes."""
    return 2 * np.pi * np.cumsum(hz) / SR


def lean_right(x, db):
    """Tip the balance to the right by db."""
    return x * undb(np.array([[-db], [db]]) / 2)


def add(out, s, x):
    """Mix x into out from time s."""
    i = int(s * SR)
    out[..., i:i + x.shape[-1]] += x[..., :N - i]


def undb(db):
    """Decibels to gain."""
    return 10 ** (np.asarray(db) / 20)


def unit(x):
    """Scale to an average (rms) level of 1."""
    return x / np.sqrt(np.mean(x ** 2))


def scene():
    """Everything together, a little stronger on the right."""
    car = tyres() + exhaust()
    close_by = handling() + rustle() + scrape() + thumps()
    return lean_right(car + close_by + background() + band_swells() + gusts(), db=1.7)


def record(dry, low_hz=18, top_hz=15850):
    """The camera drops the deepest rumble and the highest treble."""
    dry = signal.sosfilt(signal.butter(2, low_hz, "high", fs=SR, output="sos"), dry)
    return signal.sosfilt(signal.ellip(10, .2, 70, top_hz, fs=SR, output="sos"), dry)


dry = scene()
out = record(dry)
log_audio(out)
```